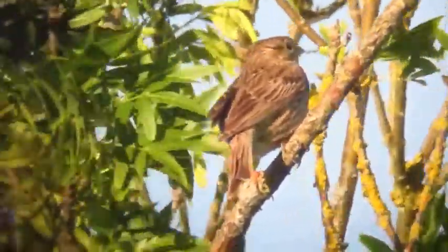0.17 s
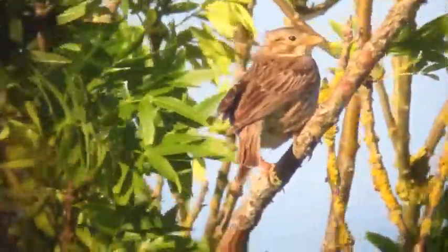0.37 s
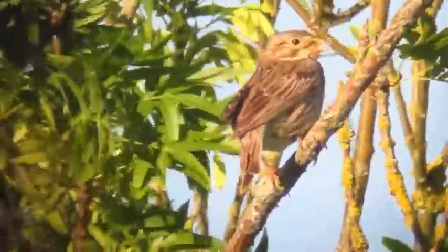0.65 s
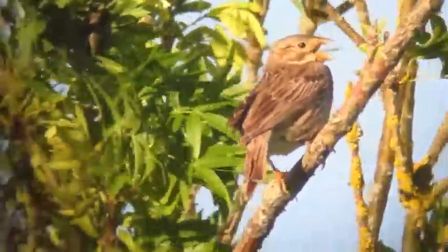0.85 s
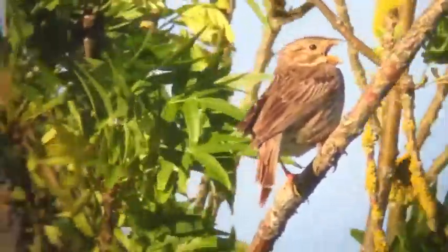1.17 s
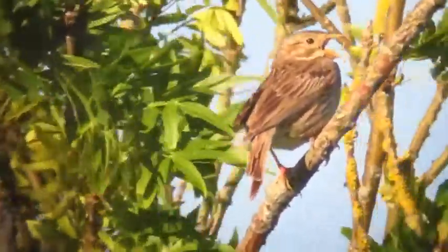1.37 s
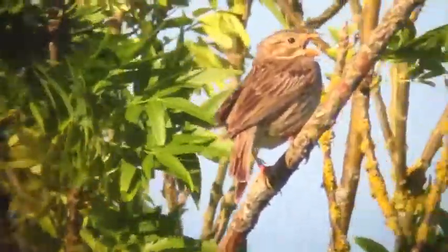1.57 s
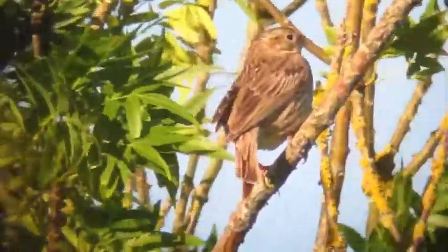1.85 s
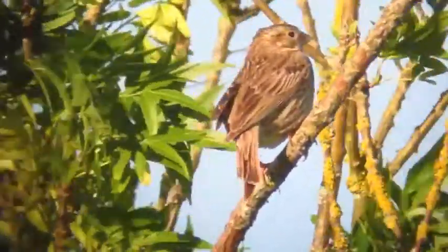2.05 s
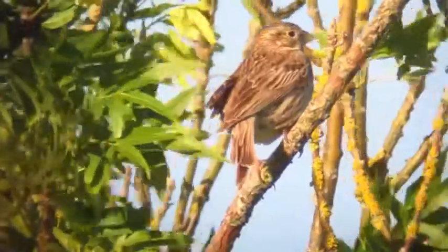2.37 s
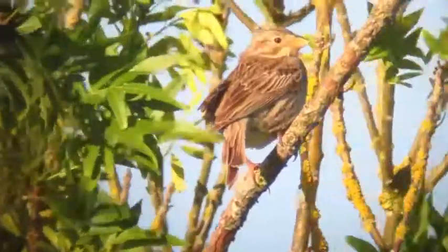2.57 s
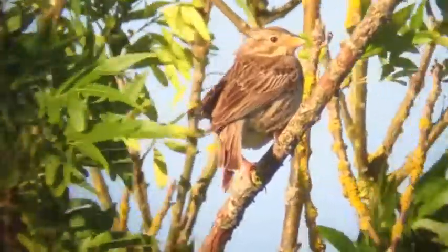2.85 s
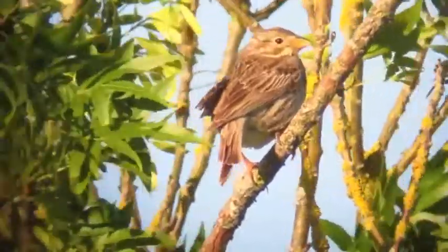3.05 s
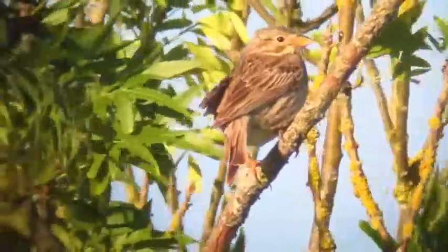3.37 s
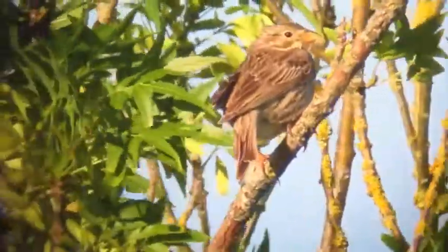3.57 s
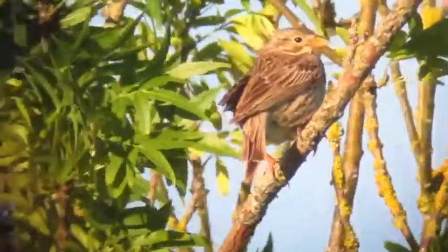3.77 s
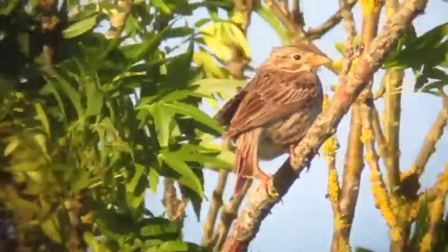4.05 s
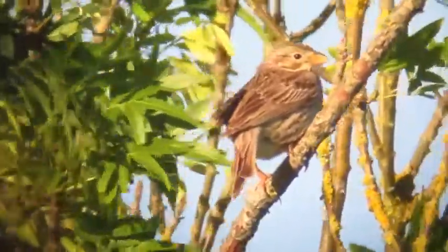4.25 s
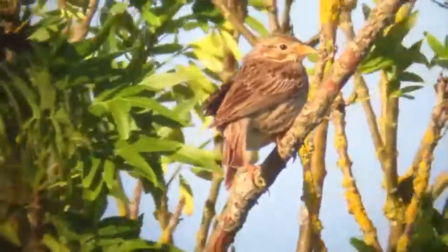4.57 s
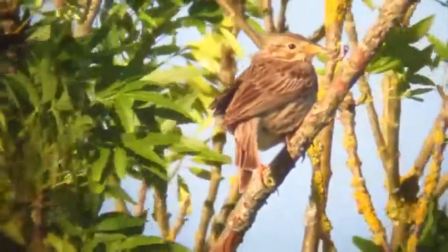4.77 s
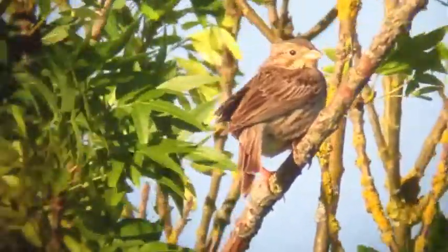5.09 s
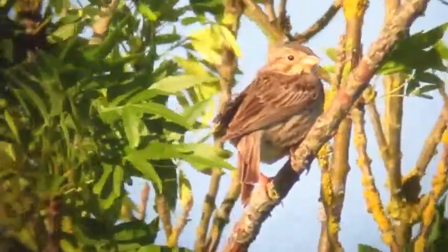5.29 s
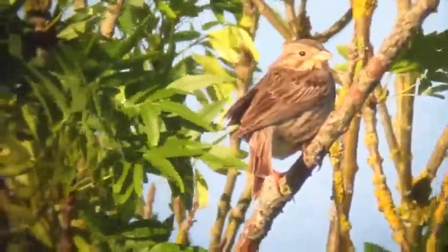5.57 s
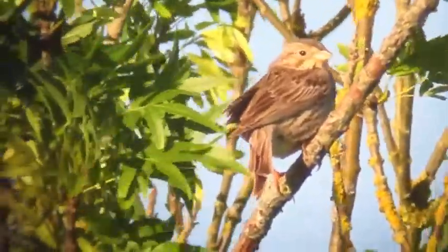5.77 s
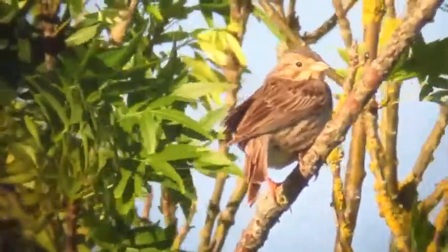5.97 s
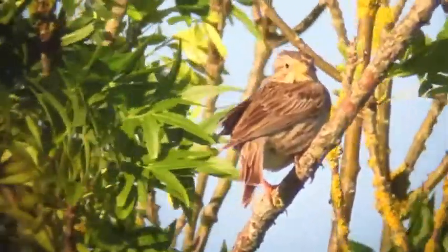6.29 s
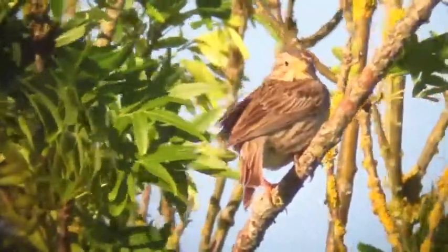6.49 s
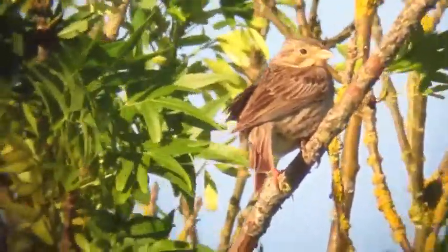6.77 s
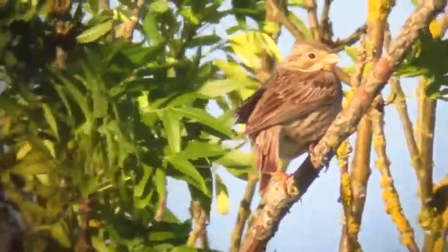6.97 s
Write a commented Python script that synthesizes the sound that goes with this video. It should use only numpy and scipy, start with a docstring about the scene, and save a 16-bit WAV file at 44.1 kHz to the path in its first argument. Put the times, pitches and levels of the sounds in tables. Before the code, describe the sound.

Outdoors among leafy branches, a steady dull rumble and light microphone hiss lie beneath everything. After a quiet second, faint high zips and scratchy buzzes twitter. Around the third second soft flicks and ticks start, then grow louder and faster into two runs of dry metallic jangling, like shaken keys. A squeaky flourish and a wheezy downward buzz with rapid pips close the song, leaving background and sparse distant chirps.

```python
"""A distant low rumble and the hiss of two microphones, both shaped noise, run throughout.
Far birds chirp now and then: single gliding whistles. A thin, high twitter of zips and buzzes comes early.
Then a corn bunting sings from a tree: ticks speed up into two runs of jangling notes, a flourish and a
falling two-voiced buzz with a burst of pips. Its notes are whistles along pitch paths, scattered by foliage."""
import sys
import numpy as np
from scipy import signal
from scipy.io import wavfile
from scipy.ndimage import uniform_filter1d

SR = 44100
rng = np.random.default_rng(int(sys.argv[2]) if len(sys.argv) > 2 else 0)


def store_wav(level_fs):
    """Save 16-bit WAV to argv[1]."""
    pcm = np.round(np.clip(np.atleast_2d(level_fs), -1, 1) * 32767)
    wavfile.write(sys.argv[1], SR, pcm.T.astype(np.int16))


N = 314433


def gain_of(db):
    """Decibels to an amplitude factor."""
    return 10 ** (np.asarray(db) / 20)


def evened(x):
    """Scales to rms 1."""
    return x / np.sqrt(np.mean(x ** 2) + 1e-20)


def add(mix, start_s, sound):
    """Adds a sound into the mix, cut off at the end of the mix."""
    part = mix[round(start_s * SR):][:len(sound)]
    part += sound[:len(part)]


def read(points, hz):
    """Interpolates a table at hz, on a log-frequency axis."""
    point_hz, value = np.transpose(points)
    return np.interp(np.log(hz + 1), np.log(point_hz + 1), value)


# Likeness of the noise at the two microphones: [frequency_hz, correlation 0-1]
LIKENESS = [(30, 0.14), (70, 0.72), (150, 0.98), (350, 0.96), (700, 0.85), (1400, 0.38), (3000, 0.48),
            (6000, 0.14), (12000, 0.12)]
# Phase by which the left microphone leads: [frequency_hz, lead_rad]
LEFT_LEAD = [(30, 0), (300, 0.39), (950, .5), (1900, 1), (4400, 2.5), (7800, 3.5), (14000, 4)]


def wash(spectrum, patchy_db):
    """Noise with patches drifting in time and frequency, at two closely spaced microphones."""
    frames = N // 1024 + 5
    hz = np.fft.rfftfreq(4096, 1 / SR)
    a, b, c, d, patches = rng.standard_normal((5, len(hz), frames))
    patches = uniform_filter1d(patches, size=8, axis=0)
    patches = evened(uniform_filter1d(patches, size=8, axis=1))
    same = read(LIKENESS, hz)[:, None]
    left = a + 1j * b
    right = same * left + np.sqrt(1 - same ** 2) * (c + 1j * d)
    right = right * np.exp(-1j * read(LEFT_LEAD, hz))[:, None]
    level_db = read(spectrum, hz)[:, None] + patchy_db * patches
    noise = signal.istft(np.array([left, right]) * gain_of(level_db), nperseg=4096, noverlap=3072)[1]
    return evened(noise[:, :N]) * gain_of([[.3], [-.3]])


# Rumble spectrum, relative: [frequency_hz, density_db_per_hz]
RUMBLE_SPECTRUM = [(12, -44), (20, -14), (54, -4), (90, -8), (124, -4), (144, 1), (236, -8.5), (312, -6.5),
                   (363, -13), (651, -14), (743, -17), (949, -18.5), (1700, -28), (1800, -30.5),
                   (2340, -35), (3960, -120)]
# Swells (+) and lulls (-) of the bass: [middle_s, half_width_s, change_db]
BASS_SWELLS = [(.1, 0.44, 0.3), (.85, 0.21, 1), (2.83, 0.15, 2), (3.5, 0.12, 1.5), (4.45, 0.34, -1),
               (6.3, 0.95, -2)]
# Microphone hiss spectrum, relative: [frequency_hz, density_db_per_hz]
HISS_SPECTRUM = [(700, -10.5), (1500, -1.5), (2600, 0), (3800, -1.5), (5000, -3.5), (7200, -8),
                 (8700, -11.5), (10300, -5.5), (13300, -11), (14500, -16), (15700, -29)]
RUMBLE_DB, HISS_DB = -42, -51.5


def background():
    """Distant rumble, whose bass swells more than its upper part, and steady microphone hiss."""
    rumble = gain_of(RUMBLE_DB) * wash(RUMBLE_SPECTRUM, patchy_db=0.86)
    bass = signal.sosfiltfilt(signal.butter(2, 400, fs=SR, output="sos"), rumble)
    t = np.arange(N) / SR
    swell_db = sum(db * np.exp(-((t - s) / width) ** 2) for s, width, db in BASS_SWELLS)
    hiss = gain_of(HISS_DB) * wash(HISS_SPECTRUM, patchy_db=2.0)
    return rumble + bass * (gain_of(swell_db) - 1) + hiss


def wobble(count, size):
    """Smooth random curve of rms 1, twice averaged over size samples."""
    smooth = uniform_filter1d(rng.standard_normal(SR // 2), size)
    return evened(uniform_filter1d(smooth, size))[:count]


def whistle(hz, db, jitter=.008, octave_db=-32):
    """One side of the syrinx: a nearly pure tone, slightly unsteady in pitch, with soft ends."""
    turns = np.cumsum(hz * (1 + jitter * wobble(len(hz), size=40))) / SR
    tone = np.sin(2 * np.pi * turns) + gain_of(octave_db) * np.sin(2 * np.pi * 2 * turns)
    ends = signal.windows.tukey(len(hz), min(1, 80 / len(hz)))
    return np.sqrt(2) * gain_of(db) * tone * ends


SWAY_PER_S = .7


def foliage(x, t60, build_s):
    """Many small echoes off leaves and twigs, different at each microphone; the swaying crown shifts them."""
    t = np.arange(SR // 2) / SR
    turn = 2 * np.pi * SWAY_PER_S * np.arange(N) / SR
    out = np.zeros((2, N))
    for share in (np.cos(turn), np.sin(turn)):
        taps = rng.choice([-1., 1.], (2, len(t)))
        taps *= rng.random((2, len(t))) < 2000 / SR  # 2000 echoes per s on average
        taps *= gain_of(-60 * t / t60) * (1 - np.exp(-t / build_s))
        taps /= np.linalg.norm(taps, axis=1, keepdims=True)
        out += signal.oaconvolve((share * x)[None], taps, axes=1)[:, :N]
    return out


# Far birds' chirps: [start_s, length_s, from_hz, to_hz, mid_arch_hz, level_db]
FAR_CHIRPS = [ (.925, 0.02, 2600, 1900, 0, -56), (2.155, .02, 3280, 2600, 0, -56),
              (2.224, 0.021, 3150, 3160, 0, -54), (2.254, 0.046, 3250, 3090, 80, -55),
              (2.38, 0.024, 2620, 2520, 90, -57), (2.49, .022, 2380, 2400, 0, -62),
              (2.757, 0.02, 3470, 3330, 0, -58), (2.781, .02, 3450, 3100, 110, -59),
              (2.809, 0.048, 3150, 3770, 167, -60.5), (2.859, 0.016, 3600, 3000, -60, -57),
              (3.112, 0.082, 3300, 3150, 128, -61.5), (3.768, .022, 3040, 3080, 0, -57),
              (3.795, 0.066, 3280, 3100, 0, -55.5), (6.349, .04, 2380, 2040, 0, -59.5),
              (6.875, 0.05, 2900, 2740, 30, -57), (6.938, 0.06, 2720, 2430, 30, -57.5),
              (7.023, .04, 2480, 2390, 0, -56)]
FAR_RISE_DB, FAR_WAVER_DB = 0.5, 1.3  # start to end; rms


def far_birds():
    """Faint gliding whistles, some arched in pitch, blurred by dense small echoes."""
    voice = np.zeros(N)
    for start_s, length_s, from_hz, to_hz, arch_hz, level_db in FAR_CHIRPS:
        u = np.linspace(0, 1, round(length_s * SR))
        hz = from_hz + (to_hz - from_hz) * u + arch_hz * np.sin(np.pi * u)
        db = level_db + FAR_RISE_DB * (u - .5) + FAR_WAVER_DB * wobble(len(u), size=400)
        add(voice, start_s, whistle(hz, db, jitter=.011))
    return voice + gain_of(-5) * foliage(voice, t60=0.19, build_s=0.0045)


def follow(rows):
    """Start time, and the other columns interpolated sample by sample."""
    s, *columns = np.transpose(rows)
    t = np.arange(s[0], s[-1] + 4 / SR, 1 / SR)
    return s[0], [np.interp(t, s, c) for c in columns]


NOTE_STRETCH, NOTE_BEND = .05, .011  # shares: largest change of duration; rms change of pitch


def notes(path, rows, jitter=0.0074, shimmer_db=1.17):
    """Whistles along one pitch path, each at its own level and pitch, stretched and bent at random."""
    out = np.zeros(N)
    for time_s, level_db, pitch in rows:
        stretch = 1 + NOTE_STRETCH * rng.uniform(-1, 1)
        lead_s, (hz, db) = follow(np.array(path) * [stretch, 1, 1])
        hz = hz * pitch * (1 + NOTE_BEND * wobble(len(hz), size=400))
        db = db + level_db + shimmer_db * wobble(len(db), size=150)
        add(out, time_s + lead_s, whistle(hz, db, jitter))
    return out


def flutter(hz, db, rate, swing, sharp, uneven, jitter, ragged_db):
    """A whistle in short pulses of random strength, each sliding down in pitch; wide swings are rougher."""
    turns = np.cumsum(rate * (1 + uneven * wobble(len(hz), size=120))) / SR
    cycle = turns % 1
    strength = rng.standard_normal(size=200)[turns.astype(int)]
    throb = evened(np.sin(np.pi * cycle) ** sharp * gain_of(ragged_db * strength))
    return throb * whistle(hz * (1 + swing * (.5 - cycle)), db, jitter * np.sqrt(swing))


def buzzes(rows, sharp, uneven, jitter, attack_s, release_s, ragged_db):
    """Fluttering whistles that rise and fade in level while the pitch glides in a straight line."""
    out = np.zeros(N)
    for start_s, length_s, from_hz, to_hz, level_db, rate, swing in rows:
        t = np.arange(0, length_s, 1 / SR)
        envelope = np.clip(np.minimum(t / attack_s, (length_s - t) / release_s), 0, 1)
        hz = np.linspace(from_hz, to_hz, len(t))
        buzz = flutter(hz, level_db, rate, swing, sharp, uneven, jitter, ragged_db)
        add(out, start_s, envelope * buzz)
    return out


# Twitter buzzes: [start_s, length_s, from_hz, to_hz, level_db, flutters_per_s, swing_share]
TWITTER_BUZZES = [ (1.009, 0.14, 6350, 6550, -54.5, 95, 0.29), (1.009, 0.14, 5400, 5450, -60, 87, .14),
                  (1.045, .092, 7150, 7200, -61, 87, .08), (1.14, .04, 4330, 4450, -52.5, 100, 0.14),
                  (1.151, 0.056, 6270, 6500, -55.5, 105, 0.21), (1.163, 0.019, 5400, 5300, -48, 110, 0.18),
                  (1.177, 0.056, 5300, 5320, -48.5, 134, 0.15), (1.205, 0.035, 7000, 7300, -56.5, 150, .16),
                  (1.238, 0.02, 7400, 7350, -51, 150, 0.071), (1.235, .029, 5900, 5600, -51.5, 72, 0.47),
                  (1.292, .025, 7350, 7650, -53.5, 78, .14), (1.363, 0.044, 5850, 5750, -49.5, 157, 0.3),
                  (1.366, .042, 7200, 7350, -54, 157, .1), (1.597, 0.11, 7180, 7300, -56.5, 86, .16),
                  (1.621, 0.068, 5830, 5820, -53, 97, .55), (1.621, 0.092, 4450, 4780, -56, 86, .1)]
# Bursts of zips: [first_s, last_s, level_db, pitch_factor]
ZIP_BURSTS = [(1.324, 1.358, -39, 0.98), (1.418, 1.526, -38.5, 0.98), (1.590, 1.590, -38.5, .98),
              (1.722, 1.777, -40.5, .98), (1.848, 1.906, -44, 0.92)]
# Path of a falling zip and of a short chip: [time_s, pitch_hz, level_db]
ZIP_PATH = [(-.009, 7500, -11), (-.003, 6790, -14), (0, 6510, 0), (.003, 5650, -8), (.0065, 4950, -12)]
CHIP_PATH = [(-.006, 4500, -11), (0, 4280, -3), (.006, 4350, -15)]
# Chips: [time_s, level_db, pitch_factor]
CHIPS = [(1.344, -53, .99), (1.432, -45, 1), (1.459, -51, 1.9), (1.486, -49, 1.8), (1.511, -52, 1.6),
         (1.565, -51, 1.03), (1.577, -51, 1.04), (1.759, -51, 1.14), (1.79, -51, 1.1), (1.831, -45, 1.6)]
ZIP_GAP_S = .028  # nominal


def twitter():
    """Downward zips and chips among short high buzzes, smeared by the nearest leaves."""
    zips = []
    for first_s, last_s, level_db, pitch in ZIP_BURSTS:
        count = 1 + round((last_s - first_s) / ZIP_GAP_S)
        zips += [(s, level_db, pitch) for s in np.linspace(first_s, last_s, count)]
    voice = notes(ZIP_PATH, zips, jitter=0.011) + notes(CHIP_PATH, CHIPS, jitter=0.023)
    voice += buzzes(TWITTER_BUZZES, sharp=3.2, uneven=.025, jitter=.05,
                    attack_s=.004, release_s=.005, ragged_db=1.2)
    scatter = gain_of(-2.5) * foliage(voice, t60=0.034, build_s=0.001)
    scatter += gain_of(-5.5) * foliage(voice, t60=0.26, build_s=.004)
    return voice * gain_of([[-3.2], [-1]]) + scatter


# Clear echoes off nearby branches: [delay_s, left_db, right_db]
BRANCH_ECHOES = [(.0037, -9, -4), (0.0199, -14, -16), (0.0228, -10.5, -11), (.0255, -16, -16),
                 (0.0309, -8, -23)]


def outdoors(x, left_db, right_db, leaves_db, echo_db, leaf_hz=2400):
    """Direct sound, clear branch echoes, scatter of the crown and a faint longer tail."""
    out = x * gain_of([[left_db], [right_db]])
    # small things reflect short waves best
    bright = signal.sosfilt(signal.butter(2, leaf_hz, "high", fs=SR, output="sos"), x)
    for delay_s, echo_left_db, echo_right_db in BRANCH_ECHOES:
        add(out[0], delay_s, gain_of(echo_db + echo_left_db) * bright)
        add(out[1], delay_s + .0001, gain_of(echo_db + echo_right_db) * bright)  # from the left
    out = out + gain_of(leaves_db) * foliage(bright, t60=.18, build_s=.008)
    return out + gain_of(-18) * foliage(bright, t60=.38, build_s=.02)


def series(count, start_s, first_gap_s, last_gap_s, first_db, last_db, pitch,
           sag=0, stray=0.0038, stray_db=0.5):
    """Note rows whose gap, level and pitch change evenly; level and pitch stray at random."""
    gaps_s = np.linspace(first_gap_s, last_gap_s, count - 1)
    times_s = start_s + np.append(0, np.cumsum(gaps_s))
    loud, high = rng.standard_normal((count, 2)).T
    levels_db = np.linspace(first_db, last_db, count) + stray_db * loud
    pitches = pitch * (1 - np.linspace(0, sag, count) + stray * high)
    return list(zip(times_s, levels_db, pitches))


def before(rows, lead_s, db, pitch):
    """Rows for a note ahead of each given one, offset in level and pitch."""
    return [(s - lead_s, level_db + db, factor * pitch) for s, level_db, factor in rows]


# Warm-up run of flicks: {count, start_s, first and last gap_s, first and last level_db, pitch_factor}
WARM_UP = dict(count=4, start_s=2.906, first_gap_s=.065, last_gap_s=.0655, first_db=-48.5, last_db=-46, pitch=1)
# Paths of the opening notes; a sigh has an upper and a lower voice: [time_s, pitch_hz, level_db]
FLICK_PATH = [(-.007, 5500, -12), (-.0035, 5350, -1), (-.001, 4750, -6), (0, 5650, -8), (.002, 5300, 0),
              (.005, 4650, -5)]
SLUR_PATH = [(-.021, 5510, -20), (-.014, 4970, -3), (-.006, 4650, 1.5), (-.002, 4900, -13)]
SIGH_PATH = [(-.006, 7420, -7), (0, 6570, 0.5), (.006, 6500, -9), (.022, 6550, -4), (.03, 6150, -12)]
UNDERSIGH_PATH = [(-.004, 5430, -10), (0, 5630, -3), (.013, 6100, 2.5), (.026, 5900, -12)]
TICK_PATH = [(-.005, 5810, -15), (-.002, 5293, -2.5), (.0005, 4730, -0.5), (.002, 3600, 0),
             (.005, 2750, -14)]
# Opening slurs and ticks: [time_s, level_db, pitch_factor]
SLURS = [(3.148, -52, 1.07), (3.224, -57, 1.25), (3.291, -51, 1.05), (3.435, -49, 1), (3.575, -44, 1),
         (3.712, -41, 1.03), (3.85, -39.5, 0.99)]
TICKS = [(3.29, -45.5, 1), (3.434, -45.5, 0.97), (3.575, -43.5, 0.99), (3.712, -39.5, 1), (3.852, -37.5, 1)]
SIGH_LEAD_S = .047


def opening():
    """Flicks, then slurs and ticks; a two-voiced sigh precedes each tick but the first."""
    sighs = before(TICKS[1:], SIGH_LEAD_S, db=-10.5, pitch=0.97)
    out = notes(FLICK_PATH, series(**WARM_UP), jitter=.04)
    out += notes(SIGH_PATH, sighs, jitter=0.0304) + notes(UNDERSIGH_PATH, sighs, jitter=.02)
    return out + notes(SLUR_PATH, SLURS, jitter=0.027) + notes(TICK_PATH, TICKS, jitter=0.042)


# Paths of the second voice of a chink, of a dip and of two faint echoes of a dip: [time_s, pitch_hz, level_db]
HOOK_PATH = [(-.002, 4560, -1), (.001, 3470, 3), (.0045, 4130, 5), (.008, 4500, -15), (.02, 4350, -2)]
DIP_PATH = [(-.007, 4457, -16), (-.002, 4107, -5.5), (.0015, 3645, 3), (.005, 3066, -6.5), (.008, 2740, -6),
            (.0135, 2667, -19), (.018, 2890, 3), (.0215, 3040, -8), (.0275, 3170, -4), (.034, 3150, -19)]
HIGH_ECHO_PATH = [(.006, 4450, -23), (.018, 4270, -15), (.026, 4150, -17), (.055, 4180, -29)]
LATE_ECHO_PATH = [(.047, 3080, -20), (.051, 3136, -11), (.055, 3200, -10), (.059, 3150, -22)]
# Chinks, dips and the tick that joins the two runs: [time_s, level_db, pitch_factor]
CHINKS = [(3.921, -41, 0.99), (4.0255, -40.5, 0.95), (4.1305, -39.5, 0.93), (4.2355, -40, .98),
          (4.3392, -39, 0.94), (4.443, -36, 0.99), (4.544, -38.5, 1), (4.6473, -36, 1),
          (4.7495, -35.5, 0.95)]
DIPS = [(3.9474, -32.5, 1), (4.053, -30.5, 1), (4.158, -30, 1), (4.263, -30, 1), (4.367, -28, 1),
        (4.4704, -27.5, 1), (4.572, -27.5, 1), (4.674, -27.5, 1), (4.777, -26.5, .99)]
LINK = [(4.85, -36.5, 0.91)]


def first_run():
    """Two-voiced chinks (tick plus hook) alternate with dips, each with a high and a late echo."""
    chinks = notes(TICK_PATH, CHINKS + LINK, jitter=0.018)
    chinks += gain_of(-2) * notes(HOOK_PATH, CHINKS, jitter=0.034)
    dips = notes(DIP_PATH, DIPS) + notes(HIGH_ECHO_PATH, DIPS, jitter=0.036)
    return chinks + dips + notes(LATE_ECHO_PATH, DIPS)


# Paths of a jangle and of the clink near its end: [time_s, pitch_hz, level_db]
JANGLE_PATH = [(-.003, 4260, -14), (0, 3670, -6.5), (.0035, 2830, -7.5), (.006, 3130, -17),
               (.0095, 3507, 2.5), (.0135, 3865, -13), (.0155, 3555, -5.5), (.0185, 2720, -3),
               (.0205, 2620, -7.5), (.026, 2372, 0), (.0285, 2014, -15), (.033, 1550, -18)]
CLINK_PATH = [(.028, 3550, -9), (.0315, 3450, -7), (.035, 3300, -35)]
# Jangles: [time_s, level_db, pitch_factor]
JANGLES = [(4.85, -28.5, 1), (4.9191, -28.5, 1), (4.9873, -29, 0.98), (5.0544, -28, 0.99),
           (5.121, -27.5, 0.99), (5.1896, -28, 0.98), (5.2582, -27, 0.99), (5.328, -27.5, 1)]


def second_run():
    """A lower, faster run: each jangle zigzags down in pitch, with a clink over its tail."""
    return notes(JANGLE_PATH, JANGLES) + notes(CLINK_PATH, JANGLES, jitter=0.027)


# Flourish buzzes: [start_s, length_s, from_hz, to_hz, level_db, flutters_per_s, swing_share]
FLOURISH_BUZZES = [ (5.421, .012, 5450, 5400, -42, 290, .24), (5.43, .027, 5380, 5100, -35, 290, 0.26),
                   (5.456, 0.023, 4950, 4820, -43, 180, .36), (5.456, 0.016, 3600, 3480, -41, 130, 0.18),
                   (5.505, 0.0153, 3590, 3840, -25.5, 300, 0.12),
                   (5.538, 0.018, 3850, 3870, -34, 330, 0.24), (5.557, .028, 3850, 3950, -41.5, 220, .24),
                   (5.538, 0.024, 4800, 4650, -45, 150, 0.32), (5.613, .022, 3750, 3720, -40, 200, 0.23),
                   (5.614, 0.041, 4650, 4140, -44, 160, 0.32)]
# Paths of the flourish notes: [time_s, pitch_hz, level_db]
WHIP_PATH = [(-.003, 2200, -6), (-.001, 3220, -8), (0, 5100, 0), (.003, 6900, -6)]
SWOOP_PATH = [(-.003, 5630, -13), (0, 5070, -7), (.002, 4450, -10), (.0045, 3860, -0.5), (.008, 3580, 0),
              (.014, 3350, -5), (.019, 2570, -9), (.022, 2300, -19)]
DROP_PATH = [(-.005, 6200, -14), (-.0015, 5440, -1), (.002, 4950, 2), (.0042, 4030, 1), (.007, 3200, -7),
             (.0105, 2350, -9)]
RISE_PATH = [(-.003, 3400, -10), (0, 3680, 0), (.003, 3850, -6), (.006, 4300, -4)]
# Flourish notes: [time_s, level_db, pitch_factor]
WHIPS = [(5.471, -41, 1), (5.5205, -36, 1), (5.606, -39, 1)]
SWOOPS = [(5.482, -25.5, 0.98)]
DROPS = [(5.532, -32, 0.97)]
RISES = [(5.61, -33, 0.93)]


def flourish():
    """Fast rising and falling whistles among short fluttering buzzes."""
    out = notes(SWOOP_PATH, SWOOPS, jitter=.015) + notes(RISE_PATH, RISES, jitter=.02)
    out += notes(DROP_PATH, DROPS, jitter=.025) + notes(WHIP_PATH, WHIPS, jitter=0.027)
    return out + buzzes(FLOURISH_BUZZES, sharp=1.7, uneven=.15, jitter=.06,
                        attack_s=.005, release_s=0.0074, ragged_db=1.5)


# Closing wheeze, lower voice: [time_s, pitch_hz, flutters_per_s, level_db]
WHEEZE_CURVE = [(5.634, 3080, 380, -43), (5.658, 2930, 370, -35.5), (5.69, 2737, 375, -33.5),
                (5.72, 2500, 320, -33.5), (5.738, 2350, 314, -34), (5.76, 2200, 160, -37)]
VOICE_GAP_HZ, WHEEZE_SWING = 557, 0.072  # upper above lower; share each flutter slides down
UPPER_DB, UPPER_FADE_DB_PER_S = -0.5, 51  # relative to the lower voice


def wheeze():
    """Both sides of the syrinx flutter at one falling pace and sink in pitch; the upper fades sooner."""
    out = np.zeros(N)
    start_s, (hz, rate, db) = follow(WHEEZE_CURVE)
    upper_db = UPPER_DB - UPPER_FADE_DB_PER_S * np.arange(len(db)) / SR
    for voice_hz, voice_db in [(hz, db), (hz + VOICE_GAP_HZ, db + upper_db)]:
        voice = flutter(voice_hz, voice_db, rate, WHEEZE_SWING,
                        sharp=1.8, uneven=.08, jitter=.045, ragged_db=2.4)
        add(out, start_s, voice)
    return out


# Path of a pip: [time_s, pitch_hz, level_db]
PIP_PATH = [(-.0025, 2750, -15), (0, 2360, 2), (.001, 2200, -9), (.003, 1750, -5)]
# Pip run: {count, start_s, first and last gap_s, first and last level_db, pitch_factor, sag and stray shares}
PIP_RUN = dict(count=7, start_s=5.7655, first_gap_s=0.0095, last_gap_s=.0115, first_db=-30, last_db=-38.5, pitch=.99, sag=.08, stray=0.017)


def pips():
    """A quick run of short falling whistles, sinking in pitch and level."""
    return notes(PIP_PATH, series(**PIP_RUN))


def bunting():
    """The song in four parts, each with its own balance of left, right, echoes and leaves."""
    start = outdoors(opening() + first_run(), left_db=-2.1, right_db=-8.5, leaves_db=-6.5, echo_db=-2.0)
    jangle = outdoors(second_run(), left_db=-4.0, right_db=-2.0, leaves_db=-6.5, echo_db=-2.5, leaf_hz=2160)
    flurry = outdoors(flourish(), left_db=-3.0, right_db=-6, leaves_db=-6.0, echo_db=-3)
    ending = outdoors(wheeze() + pips(), left_db=-5.0, right_db=-3.5, leaves_db=-6.5, echo_db=-1.5, leaf_hz=1900)
    return start + jangle + flurry + ending


def scene():
    """Everything at the two microphones."""
    return background() + far_birds() + twitter() + bunting()


NOTCH_HZ, EDGE_HZ = (7680, 8530), 15700


def record(dry):
    """Cuts a notch in the treble, then low-passes at the band edge."""
    notched = signal.sosfilt(signal.butter(3, NOTCH_HZ, "bandstop", fs=SR, output="sos"), dry)
    low_pass = signal.firwin(511, EDGE_HZ, window=("kaiser", 9), fs=SR)
    return signal.oaconvolve(notched, low_pass[None], "same")


dry = scene()
out = record(dry)
store_wav(out)
```